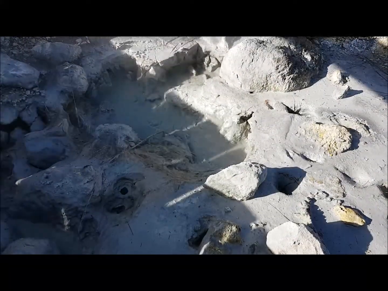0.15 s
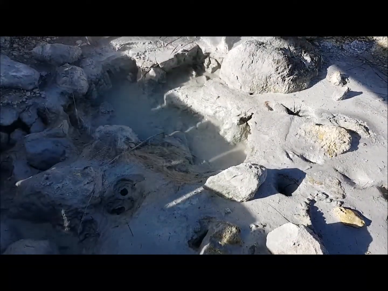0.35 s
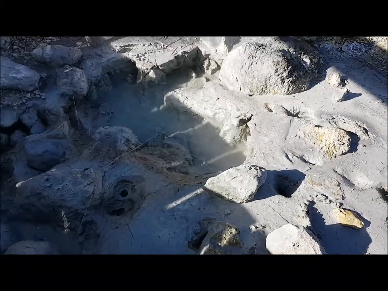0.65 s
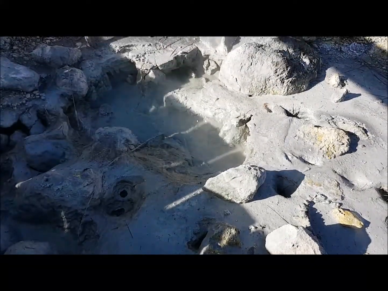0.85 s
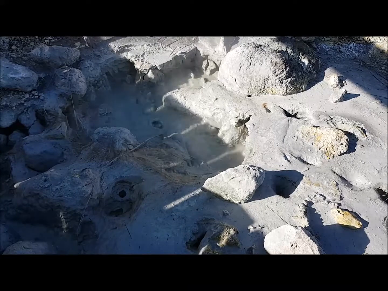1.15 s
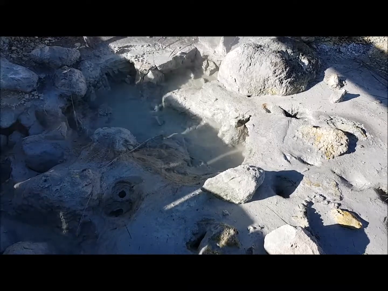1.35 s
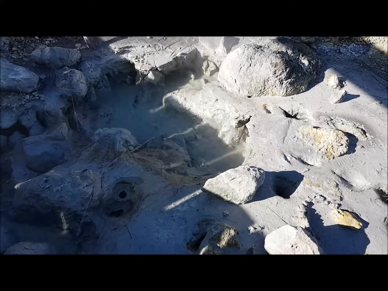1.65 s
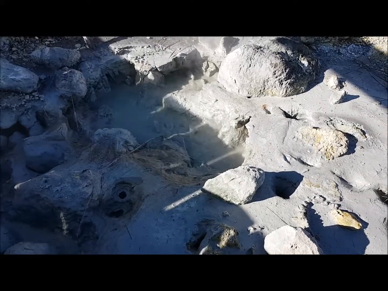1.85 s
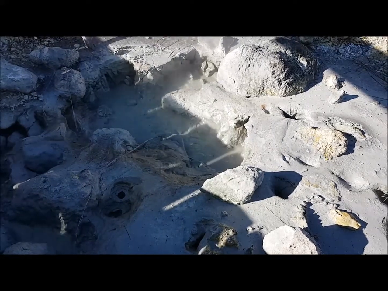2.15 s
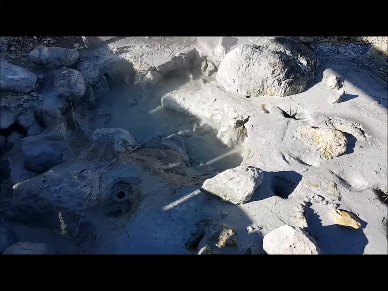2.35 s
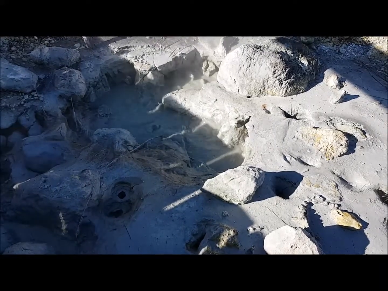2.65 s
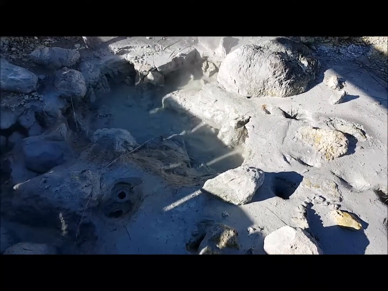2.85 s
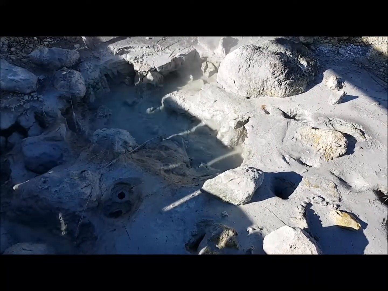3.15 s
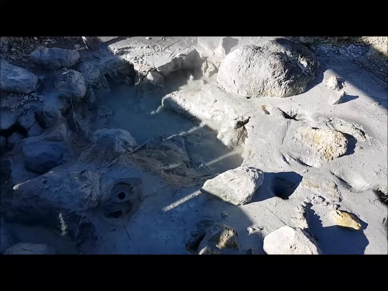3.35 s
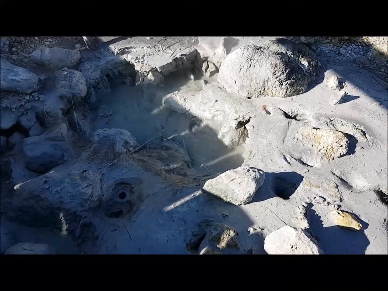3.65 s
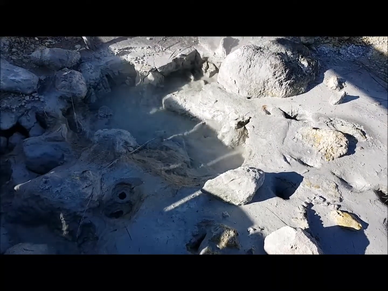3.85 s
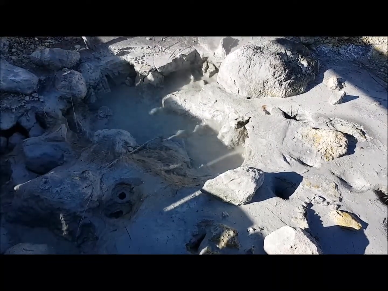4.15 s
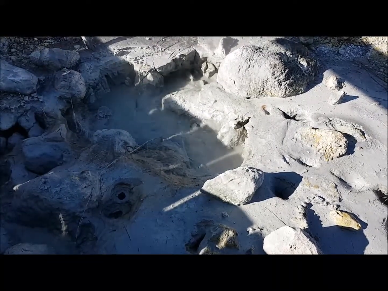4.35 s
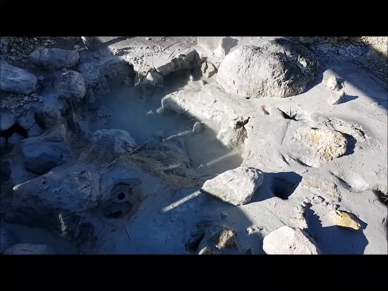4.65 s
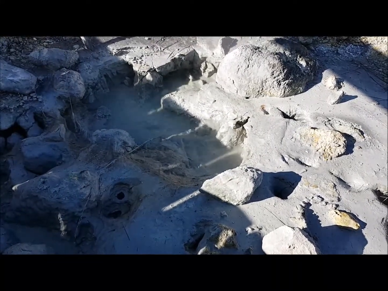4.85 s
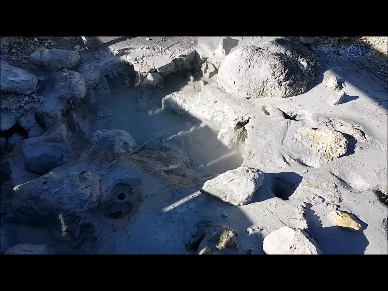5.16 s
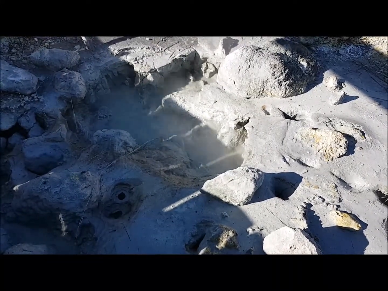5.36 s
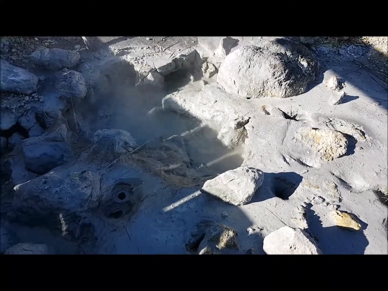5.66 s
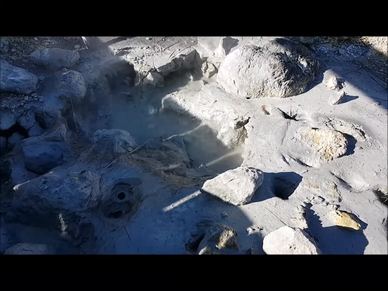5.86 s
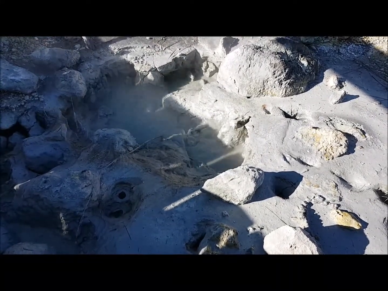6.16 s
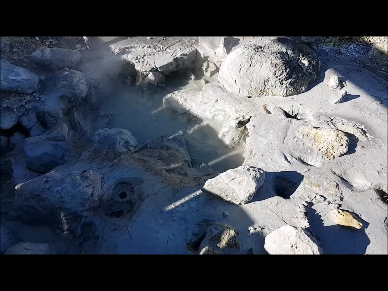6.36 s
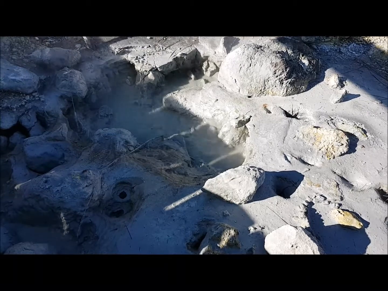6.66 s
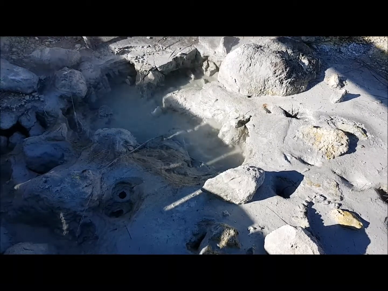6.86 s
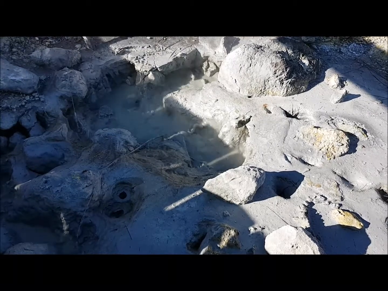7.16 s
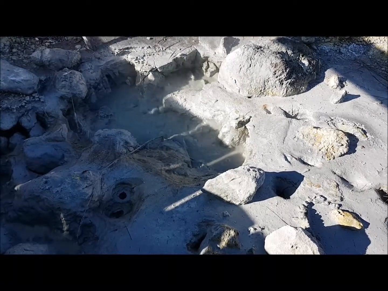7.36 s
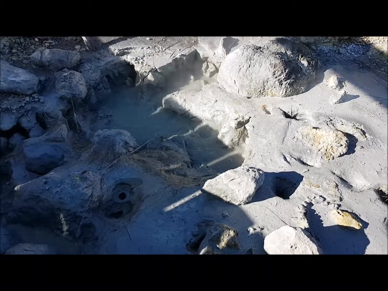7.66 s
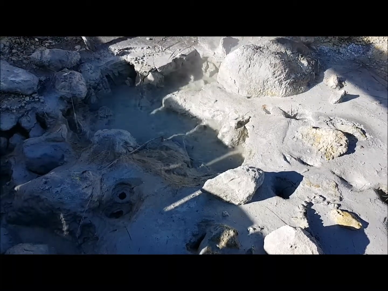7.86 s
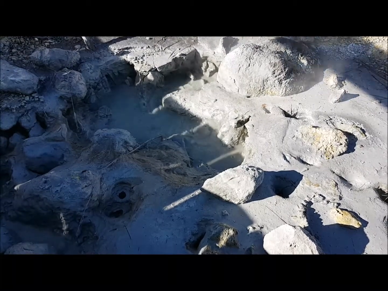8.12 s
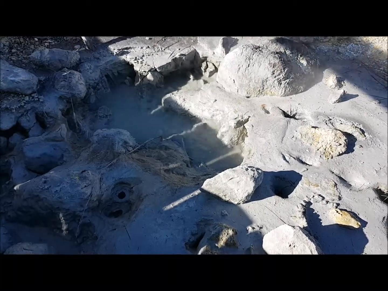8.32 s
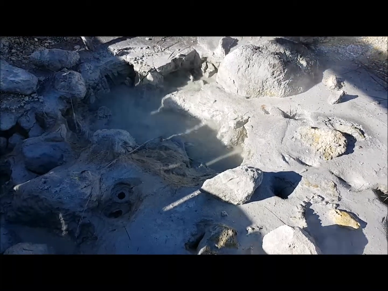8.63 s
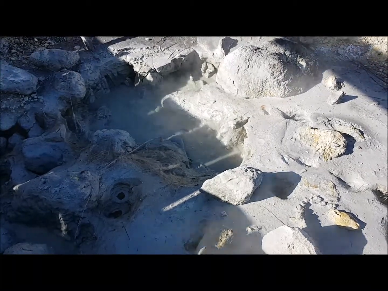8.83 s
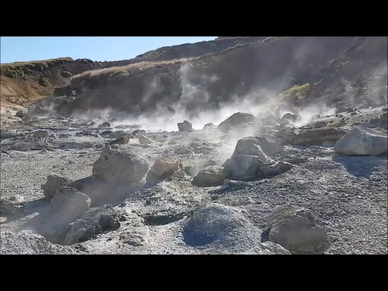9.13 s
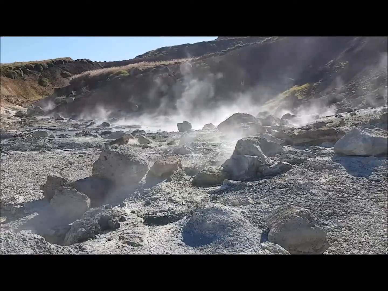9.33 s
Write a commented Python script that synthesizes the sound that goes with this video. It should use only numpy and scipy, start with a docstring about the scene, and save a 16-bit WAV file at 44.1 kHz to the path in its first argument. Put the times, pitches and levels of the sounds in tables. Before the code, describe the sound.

From the start, a hot mud pool boils close to a stereo microphone outdoors. Dense, irregular gulps, round and hollow around the middle pitches, overlap a crowd of smaller bubbles, with short reflections from surrounding rocks. Brighter pops, wet spits, tiny plinks and fine crackle scatter across the width above a thin steady steam hiss and faint low rumble. Wind buffets the microphone at 0.4-0.8 s, lightly around 1.5-2.4 s, hardest at about 3.0 s with low thumps, and again near 4.3 s; the level dips for an instant at 1.4 s. Afterwards the bubbling is clearer, with sharp burst clusters at 6.1 s and a strong pop at 8.2 s. At 8.94 s everything cuts to a very brief silence. From 9.0 s, distant steam vents give a wavering low roar with thin hiss and three dull blubs between 9.2 and 9.35 s.

```python
"""A hot mud pool boils outdoors: swelling sines gulp in a rocky hollow, skins ping and rattle as they burst,
noise puffs spit, random clicks crackle and filtered noise makes a thin hiss of steam over a low rumble.
Gusts of filtered noise and low thumps buffet the two microphone ports, mostly up to 4.5 s; the level dips
briefly at 1.39 s. The pool stops at 8.94 s, a short silence follows, and from 9 s a second scene plays:
distant steam vents, a wavering low noise roar with thin hiss and three dull blubs."""
import sys
import numpy as np
from scipy import signal
from scipy.fft import rfft, irfft
from scipy.io import wavfile

SR = 44100
rng = np.random.default_rng(int(sys.argv[2]) if len(sys.argv) > 2 else 0)


def inscribe(sig):
    """Save sig as 16-bit PCM at rate SR to the path in sys.argv[1].

    A 1-D sig is mono; a 2-D sig holds one channel per row.
    Samples are clipped to [-1, 1] before scaling.
    """
    pcm = np.round(np.clip(np.atleast_2d(sig).T, -1, 1) * 32767)
    wavfile.write(sys.argv[1], SR, pcm.astype(np.int16))


N = 418489
TIME = np.arange(N) / SR
FREQS = np.fft.rfftfreq(N, 1 / SR)
POOL_END_S = 8.944

# phase lead of the left port over the right, by bubble pitch: pitch_hz, lead_rad
LEAD = [(100, -2), (450, 0), (560, 0.32), (700, 0.7), (900, 0), (1300, 3.5), (2000, 2)]
# spectrum of wet crackle: freq_hz, gain_db
SPATTER = [(300, -27), (800, 4.5), (1100, 2.5), (1600, 0), (2000, 2.5), (2400, -2), (3000, -9), (4500, -18),
           (7000, -17.5), (9000, -19), (15500, -16.5)]


def amp(db):
    """Decibels to gain."""
    return 10 ** (np.asarray(db) / 20)


def unit(x):
    """Scales to rms 1."""
    return x / np.sqrt(np.mean(x ** 2) + 1e-20)


def at_hz(points, hz):
    """Interpolates a table on a log-frequency axis."""
    f, value = np.transpose(points)
    return np.interp(np.log(hz + 1), np.log(f + 1), value)


def sides(db):
    """Left and right gains for a left-right level difference."""
    return amp(np.array([[.5], [-.5]]) * db)


def port_lead(hz):
    """Opposite phase offsets (rad) at the left and right ports for this pitch."""
    return np.array([[.5], [-.5]]) * at_hz(LEAD, hz)


def colour(x, points, size=2048):
    """Minimum-phase filter with the given spectrum."""
    log_gain = np.log(amp(at_hz(points, abs(np.fft.fftfreq(2 * size, 1 / SR)))))
    response = np.exp(signal.hilbert(log_gain).conj())
    taps = np.fft.ifft(response).real[:size]
    return signal.oaconvolve(x, taps[None], axes=1)[:, :N]


def drift(per_s):
    """Smooth noise of rms 1 that changes about per_s times a second."""
    lowpass = np.exp(-(FREQS / per_s) ** 2)
    return unit(irfft(rfft(rng.standard_normal(N)) * lowpass, N))


def simmer(swing_db, per_s):
    """Gain that swells and eases at random."""
    return amp(swing_db * drift(per_s))


def add(mix, s, sound):
    """Mixes a stereo sound in at time s."""
    part = mix[:, max(round(s * SR), 0):][:, :sound.shape[1]]
    part += sound[:, :part.shape[1]]


def chance(per_s, count):
    """Poisson event times at per_s a second, each with count normal deviates clipped to +-2."""
    draws = rng.standard_normal((400, count + 2))
    gaps_s = (draws[:, 0] ** 2 + draws[:, 1] ** 2) / (2 * per_s)  # exponential gaps
    times_s = np.cumsum(gaps_s)
    return [(s, *np.clip(row, -2, 2)) for s, row in zip(times_s, draws[:, 2:]) if s < POOL_END_S]


def rocks(x, t60, wet_db, size=4096):
    """Scattered reflections from the rocks: decaying noise tail, different at each port."""
    t = TIME[:size]
    tail = rng.standard_normal((2, size)) * amp(-60 * t / t60) * (t > .002)
    tail /= np.linalg.norm(tail, axis=1, keepdims=True)
    return x + amp(wet_db) * signal.oaconvolve(x, tail, axes=1)[:, :N]


def hollow_ring(x, hz, width_hz, ring_db):
    """One air mode of the hollow, a resonator, rings on after each sound."""
    b, a = signal.iirpeak(hz, hz / width_hz, fs=SR)
    return x + amp(ring_db) * signal.lfilter(b, a, x, axis=1)


def bubble(hz, swell_s, glide, size=2600):
    """A gas pocket swells into a few cycles and dies; its pitch rises as it opens."""
    u = TIME[:size] / max(swell_s, .0003)
    pitch_hz = hz * (1 + glide * (np.tanh(u / 4) - .35))
    turns = np.cumsum(pitch_hz) / SR
    return (u * np.exp(1 - u)) ** 1.5 * np.sin(2 * np.pi * turns + port_lead(hz))


def spray(hz, width, fade_s, swell_s=0.002, grain_db=7, size=2048):
    """A puff of uneven noise grains around one pitch that swells quickly and fades."""
    t, f = TIME[:size], np.fft.rfftfreq(size, 1 / SR)
    band = np.exp(-.5 * (np.log((f + 1) / hz) / width) ** 2)
    shape = (1 - np.exp(-(t / swell_s) ** 2)) * np.exp(-t / fade_s)
    grain_gain = amp(grain_db * np.minimum(rng.exponential(1, (2, size)), 5))
    grains = rng.standard_normal((2, size)) * grain_gain
    return unit(irfft(rfft(grains) * band)) * shape / shape.max()


def gulps(trim_db=-0.6, tick_db=-27, tick_s=.002, echo_db=-14, size=2600):
    """Bubbles break the surface, each with a faint wet tick; the wall of the hollow answers."""
    # individual gulps, before trim and room: start_s, level_db, pitch_hz, swell_s
    single_gulps = [(.103, -28, 540, 0.004), (.148, -33, 560, 0.0021), (.204, -32, 500, 0.0025),
                    (.25, -34, 549, .003), (.423, -28.5, 484, 0.0026), (.514, -30, 533, 0.0025),
                    (.588, -28.5, 516, 0.0048), (.669, -31, 590, 0.0026), (.698, -25.5, 525, 0.0012),
                    (.755, -26.5, 544, 0.005), (.9075, -27, 500, 0.0022), (.939, -31, 534, 0.0023),
                    (.982, -19, 585, 0.0012), (1.002, -20, 660, 0.0019), (1.064, -27.5, 600, 0.0027),
                    (1.141, -27, 690, 0.0024), (1.159, -25, 723, 0.0025), (1.2645, -25, 543, 0.002),
                    (1.455, -24.5, 450, 0.0028), (1.498, -25.5, 650, .0024), (1.5195, -28, 447, 0.0024),
                    (1.544, -25, 523, 0.0023), (1.5825, -25, 530, 0.0029), (1.641, -26, 700, 0.0014),
                    (1.691, -27, 537, 0.0029), (1.817, -25, 540, 0.0029), (1.836, -28, 546, .004),
                    (1.868, -31, 594, .003), (1.889, -27.5, 556, 0.0033), (2.011, -30, 528, 0.0039),
                    (2.077, -30, 490, .003), (2.144, -30, 500, 0.0032), (2.161, -34, 530, 0.0029),
                    (2.308, -23.5, 533, 0.0042), (2.338, -21, 523, 0.0033), (2.457, -29, 732, 0.0031),
                    (2.502, -28, 523, 0.003), (2.53, -32, 524, 0.0036), (2.552, -29, 607, 0.0023),
                    (2.618, -32, 530, 0.0054), (2.701, -21, 644, 0.0024), (2.724, -24, 566, 0.0013),
                    (2.7365, -24, 540, 0.0024), (2.779, -28, 536, 0.002), (2.888, -20.5, 703, 0.0019),
                    (3.0065, -22.5, 456, 0.0019), (3.019, -26.5, 694, 0.002), (3.073, -24, 536, 0.0022),
                    (3.111, -28, 593, 0.0025), (3.162, -23, 680, .0016), (3.213, -25, 576, 0.0017),
                    (3.229, -25, 535, 0.0018), (3.309, -29, 560, 0.0032), (3.355, -27, 430, 0.0034),
                    (3.396, -36, 565, 0.0023), (3.649, -28, 507, 0.0022), (3.691, -30, 520, 0.0037),
                    (3.761, -29.5, 501, 0.0027), (3.819, -29, 528, 0.0035), (3.872, -29, 495, 0.0023),
                    (3.965, -29, 479, .003), (4.001, -26.5, 670, 0.0034), (4.02, -21, 606, 0.0016),
                    (4.037, -26, 484, .0026), (4.103, -28.5, 494, 0.0038), (4.122, -31, 506, 0.0033),
                    (4.1466, -19.5, 716, 0.0031), (4.209, -32, 470, 0.0025), (4.248, -29, 510, .003),
                    (4.384, -27.5, 547, .0028), (4.414, -26.5, 720, 0.0047), (4.468, -28, 533, 0.0032),
                    (4.497, -24.5, 525, 0.0017), (4.588, -32.5, 501, 0.0028), (4.636, -28, 690, 0.0028),
                    (4.72, -21.5, 503, 0.0013), (4.733, -25, 640, .0014), (4.835, -29, 538, .003),
                    (4.858, -32, 501, 0.0035), (4.936, -24.5, 507, 0.0024), (4.95, -23, 638, 0.0024),
                    (5.004, -33, 570, 0.0035), (5.048, -23.5, 694, 0.0033), (5.06, -25.5, 530, 0.003),
                    (5.079, -25, 680, .0022), (5.142, -27, 520, 0.0026), (5.1735, -25.5, 530, 0.0028),
                    (5.251, -22, 696, 0.0032), (5.306, -25, 560, 0.0024), (5.346, -31, 520, .003),
                    (5.361, -25.5, 540, 0.0015), (5.452, -31, 563, 0.0032), (5.546, -25.5, 633, 0.0027),
                    (5.56, -30, 511, .003), (5.584, -27, 496, .003), (5.597, -35, 530, .003),
                    (5.658, -26, 614, 0.0015), (5.732, -29, 534, 0.0034), (5.817, -28, 500, 0.0025),
                    (5.937, -29.5, 480, 0.0025), (5.993, -33, 517, 0.0027), (6.086, -32, 520, 0.0028),
                    (6.115, -31, 744, 0.0017), (6.125, -23, 560, 0.0018), (6.167, -29, 517, .003),
                    (6.21, -28.5, 490, 0.0023), (6.347, -31, 510, 0.0048), (6.367, -26.5, 530, 0.002),
                    (6.385, -30, 526, 0.0025), (6.409, -27, 500, 0.0032), (6.507, -27, 523, 0.0052),
                    (6.537, -26, 655, 0.0021), (6.558, -32, 520, 0.0025), (6.588, -30, 503, 0.0053),
                    (6.616, -27.5, 500, 0.0032), (6.653, -29, 538, 0.0027), (6.727, -32, 680, 0.0017),
                    (6.746, -22.5, 694, 0.0015), (6.764, -30.5, 487, 0.0035), (6.828, -30, 516, 0.0028),
                    (6.863, -31, 511, 0.0025), (6.885, -27.5, 680, 0.0027), (6.907, -28, 699, .0025),
                    (7.066, -25, 670, 0.0017), (7.079, -22, 710, 0.0022), (7.113, -32, 530, 0.0023),
                    (7.132, -33, 501, 0.0026), (7.144, -29.5, 536, 0.0046), (7.1975, -22, 630, 0.0012),
                    (7.251, -19, 600, 0.0014), (7.262, -25.5, 522, 0.004), (7.276, -28.5, 525, 0.0023),
                    (7.327, -30.5, 495, .003), (7.357, -32.5, 479, 0.0033), (7.405, -27, 517, 0.0051),
                    (7.437, -26.5, 544, 0.0028), (7.504, -21.5, 680, 0.0033), (7.589, -26, 528, 0.0057),
                    (7.628, -29.5, 520, 0.0021), (7.708, -30, 520, 0.0023), (7.76, -26.5, 513, 0.0047),
                    (7.783, -25, 690, 0.0029), (7.8205, -28, 503, 0.0033), (7.867, -27, 540, 0.0028),
                    (7.99, -27, 502, 0.0032), (8.074, -21.5, 534, 0.0039), (8.101, -26, 510, 0.0014),
                    (8.174, -23.5, 500, 0.0029), (8.195, -27, 527, 0.0027), (8.231, -22, 593, 0.0013),
                    (8.249, -29, 560, .003), (8.262, -32, 500, 0.0024), (8.281, -27, 560, .0016),
                    (8.325, -31, 516, 0.0029), (8.373, -24.5, 573, 0.0047), (8.393, -31.5, 245, 0.0045),
                    (8.448, -24, 560, 0.0015), (8.48, -27.5, 680, 0.004), (8.499, -30.5, 538, 0.0026),
                    (8.577, -26, 725, 0.0045), (8.609, -33, 540, 0.0027), (8.642, -28.5, 530, 0.0028),
                    (8.808, -23, 554, 0.0021), (8.859, -27.5, 526, .003), (8.899, -27, 603, .0018)]
    tones, ticks = np.zeros((2, 2, N))
    tick_fade = np.exp(-TIME[:size] / tick_s)
    for s, db, hz, swell_s in list(single_gulps) + random_gulps():
        tone = amp(db + trim_db) * bubble(hz, swell_s, glide=rng.uniform(0.0138, 0.081))
        add(tones, s, tone)
        add(tones, s + rng.uniform(0.00389, 0.00738), amp(echo_db) * tone)
        add(ticks, s, amp(db + tick_db) * rng.standard_normal((2, size)) * tick_fade)
    boil = hollow_ring(tones, hz=503, width_hz=50, ring_db=-9)
    return rocks(boil + colour(ticks, SPATTER), t60=0.08, wet_db=-14)


def random_gulps(per_s=8, level_db=-34, spread_db=1.5, low_hz=500, high_hz=680, high_share=.3,
                 scatter=0.13, swell_s=0.0022):
    """More bubbles rise at random; most ring low in the hollow, some higher."""
    events = []
    for s, a, b, c in chance(per_s, count=3):
        hz = high_hz if rng.random() < high_share else low_hz
        events.append((s, level_db + spread_db * a, hz * np.exp(scatter * b), swell_s * np.exp(0.3 * c)))
    return events


def churn(level_db=-39.5, swell_cycles=1, lag_samples=9, count=48):
    """A crowd of smaller bubbles of all sizes, ringing in the hollow."""
    # small bubbles as the hollow colours them: freq_hz, gain_db
    hollow = [(40, -30.5), (120, -14), (250, -8), (320, -7), (380, -1), (440, 0.5), (510, 4), (590, -1),
              (640, -5), (710, -1.5), (830, -8.5), (1000, -11.5), (1250, -17.5), (1550, -26), (3000, -39)]
    sizes = amp(2.3 * np.minimum(rng.exponential(1, N), 3))
    sizes *= rng.random(N) < 1300 / SR  # 1300 bubbles a second
    kind, out = rng.integers(0, count, N), np.zeros((2, N))
    for k, hz in enumerate(np.geomspace(110, 1700, count)):
        left, right = bubble(hz, swell_cycles / hz, glide=0.19) * hz
        lag = lag_samples * (-1) ** k  # neighbouring sizes rise at opposite banks
        ring = np.array([np.roll(left, max(lag, 0)), np.roll(right, max(-lag, 0))])
        out += signal.oaconvolve((sizes * (kind == k))[None], ring, axes=1)[:, :N]
    crowd = unit(rocks(colour(out, hollow), t60=0.067, wet_db=-9.5))
    return amp(level_db) * simmer(swing_db=1.0, per_s=14) * crowd


def pops(ring_cycles=1.58, spray_db=-13.5, spray_s=0.0039, width=0.18, size=2048):
    """A mud skin bursts: a short ping together with a wet rattle around the same pitch."""
    # individual bursts, before room: start_s, level_db, pitch_hz, left_right_db
    bursts = [(.203, -35, 1900, 4), (.253, -34, 1120, 2), (.419, -39, 1280, -1), (.54, -34, 1110, 2),
              (.569, -36, 1930, 4), (.5935, -35, 1620, 3), (.709, -36, 1240, 0), (.767, -35, 1460, 1),
              (.931, -38, 1280, -1), (1.066, -34, 2050, 3), (1.069, -28, 1400, 4), (1.084, -34, 1030, -1),
              (1.118, -34, 1200, 2), (1.308, -33, 1220, 2), (1.495, -35, 1800, 6), (1.6425, -34, 1040, -1),
              (1.892, -32, 2140, 5), (1.956, -37, 1880, 4), (2.044, -37, 1040, -2), (2.228, -34, 1660, -4),
              (2.282, -41, 1090, 1), (2.38, -40, 1230, 1), (2.531, -32, 1260, 1), (2.78, -35, 1120, 4),
              (2.827, -29, 1130, -2.5), (2.854, -36, 1080, 1), (2.925, -37, 1140, 3), (2.967, -40, 1030, 4),
              (3.004, -32, 1710, -8), (3.106, -33, 1140, -4), (3.128, -26, 1340, 3), (3.138, -31, 2080, 4),
              (3.205, -35, 2010, 5), (3.303, -30, 1990, 4), (3.533, -35, 1770, 2), (3.689, -38, 1440, 3),
              (3.835, -33, 1140, -1), (3.894, -27.5, 2400, 7), (4.131, -32.5, 2230, 7),
              (4.262, -39, 1120, -2), (4.413, -32, 990, -1), (4.49, -37, 2050, 6), (4.638, -36, 1840, 6),
              (4.699, -41, 1100, 0), (4.7345, -34, 960, -3), (4.828, -30, 1860, 8), (5.361, -34, 1080, -1),
              (5.381, -36, 1050, -1), (5.4, -33.5, 1840, 4), (5.455, -32, 1970, 6), (5.475, -33.5, 1090, 2),
              (5.49, -36, 1060, 0), (5.544, -30, 1370, 5), (5.7385, -32, 1050, 0), (5.754, -33, 2160, -1),
              (5.8175, -34, 980, 2), (5.854, -33, 2060, -1), (5.889, -32, 1190, -3), (5.979, -38, 1090, 4),
              (6.113, -33, 2090, 3), (6.1145, -29, 1180, 1), (6.123, -33, 2960, 4), (6.1375, -26, 1850, -3),
              (6.1385, -29, 1150, 2), (6.1425, -26.5, 1370, 2), (6.147, -32, 1200, 3),
              (6.289, -36, 1080, 1), (6.37, -37, 1910, 3), (6.724, -35, 1150, 2), (6.761, -33, 1270, 0),
              (6.9085, -36, 960, 2), (7.06, -39, 1890, 4), (7.181, -33, 1010, 0), (7.788, -24.5, 1860, 4),
              (7.894, -32, 1880, 7), (7.906, -33, 1900, 4), (7.918, -30, 1910, 5), (8.101, -36, 1890, 2),
              (8.134, -31, 1470, 3), (8.201, -34, 1200, 1), (8.222, -31, 1060, 3), (8.229, -31, 2050, 2),
              (8.2337, -19.5, 1010, 0), (8.234, -19.5, 1900, 7), (8.2375, -27, 2000, -6),
              (8.2385, -36, 900, -1), (8.244, -30, 2140, -5), (8.425, -33, 2010, 5), (8.445, -38, 1120, 4),
              (8.786, -30, 1930, 7), (8.817, -36, 1290, 3), (8.8285, -29, 1250, 5), (8.917, -34, 1860, 3),
              (8.929, -37, 1090, 7)]
    out, t = np.zeros((2, N)), TIME[:size]
    for s, db, hz, pan_db in list(bursts) + random_pops():
        u = t * hz / ring_cycles
        lead = port_lead(hz) * rng.uniform(0.69, 1)
        ping = (u * np.exp(1 - u)) ** 2 * np.sin(2 * np.pi * hz * t + lead)
        rattle = amp(spray_db) * spray(hz, width, spray_s)
        add(out, s, amp(db) * sides(pan_db) * (ping + rattle))
    return rocks(hollow_ring(out, hz=2000, width_hz=180, ring_db=-9), t60=0.08, wet_db=-12.5)


def random_pops(per_s=5, level_db=-44, hz=1950, scatter=0.2, pan_db=3, pan_spread_db=3.0):
    """Weaker bursts come at random across the pool, all at one level."""
    return [(s, level_db, hz * np.exp(scatter * a), pan_db + pan_spread_db * b)
            for s, a, b in chance(per_s, count=2)]


def spits(width=0.23, snap_db=-9, snap_hz=7800, snap_width=0.25, snap_s=0.0025):
    """A thin film snaps and its droplets patter down: two noise puffs at once."""
    # individual droplet showers, before room: start_s, level_db, centre_hz, left_right_db, fade_s
    showers = [(.204, -48.5, 4400, .5, 0.0055), (.217, -47, 3310, 3, .005), (.237, -53, 3370, -1, .004),
               (.366, -56, 4080, -3, .003), (.566, -47, 4630, -5, .006), (1.118, -49, 3680, -2, .0054),
               (1.771, -51, 5040, 2, 0.0056), (1.791, -47, 4560, 3, .003), (1.892, -45, 3480, 0, 0.0044),
               (1.928, -48, 4790, 3, .003), (1.942, -48, 3560, -.5, .0055), (1.962, -50, 2850, 1, .004),
               (2.102, -48.5, 4800, -2, .0046), (2.38, -47, 3520, -2, 0.0036), (2.531, -49, 3710, -1, .006),
               (2.731, -53, 3880, 7, 0.0037), (2.826, -52, 3720, -6, .004), (2.925, -50, 3640, -2, 0.0082),
               (2.975, -44, 3040, 3, .004), (3.015, -50, 5160, 4, .005), (3.205, -45, 3000, 4, 0.0024),
               (3.892, -38.5, 4770, 4, 0.0015), (3.893, -42, 11500, 2, 0.0017), (4.13, -49, 4370, 3, .003),
               (4.38, -51, 3540, 0, .003), (4.731, -48, 14400, 9, .0055), (4.749, -47, 3440, -3, .003),
               (5.387, -52, 3650, -1, .004), (5.454, -53, 2860, -2, .004), (5.469, -50, 3710, -2, .004),
               (5.661, -43.5, 3620, 0, 0.009), (5.74, -46, 3540, 1, .005), (5.752, -48.5, 3650, 0, .004),
               (6.004, -46, 14000, 1.5, .0042), (6.138, -46.5, 4330, -3, 0.0035),
               (6.368, -42, 3640, -7, 0.004), (6.652, -50, 3600, -3, .006), (6.847, -48, 3710, 2, 0.0038),
               (7.276, -50, 3950, 2, .003), (7.304, -43.5, 4640, -1, 0.0033),
               (7.707, -47.5, 4780, 5, 0.0027), (7.787, -49, 3740, 0, 0.0024),
               (7.917, -45.5, 3070, 0, .004), (8.108, -46, 13800, 4, 0.0054), (8.133, -49, 3700, 0, .003),
               (8.274, -52, 3430, 3, .004), (8.43, -50, 8100, 7, 0.0031), (8.595, -47, 3140, 5, .004)]
    out = np.zeros((2, N))
    for s, db, hz, pan_db, fade_s in list(showers) + random_spits():
        snap = amp(snap_db) * spray(snap_hz, snap_width, snap_s)
        add(out, s, amp(db) * sides(pan_db) * (spray(hz, width, fade_s) + snap))
    return rocks(out, t60=0.082, wet_db=-8.0)


def random_spits(per_s=1.3, level_db=-55, spread_db=1.0, hz=3700, scatter=0.11, fade_s=0.01):
    """Faint showers of droplets fall at random, all centred."""
    return [(s, level_db + spread_db * a, hz * np.exp(scatter * b), 0, fade_s)
            for s, a, b in chance(per_s, count=2)]


def crackle(per_s, spread_db, clump_db, count=9):
    """Clumps of tiny clicks from spots across the pool, each spot with its own delay between the ports."""
    sizes = amp(spread_db * np.minimum(rng.exponential(1, N), 4) + clump_db * drift(per_s=20.4))
    left = sizes * rng.choice([-1, 1], N) * (rng.random(N) < per_s / SR)
    spot = rng.integers(0, count, N)
    lags = np.linspace(-18, 18, count).astype(int)  # samples
    right = sum(np.roll(left * (spot == k), lag) for k, lag in enumerate(lags))
    return np.array([left, right])


def spatter(level_db=-53.5):
    """Thin films of mud snap all over the pool: coloured clicks."""
    snaps = colour(crackle(per_s=900, spread_db=4.0, clump_db=3), SPATTER)
    return amp(level_db) * simmer(swing_db=1.0, per_s=5) * unit(rocks(snaps, t60=0.03, wet_db=-5))


def drips(level_db=-58.5, per_s=150, spread_db=4.5, clump_db=3, cycles=3, count=24):
    """Tiny bubbles and falling drops plink in clusters, with a phase at each port for each pitch."""
    # plink strength by pitch: pitch_hz, gain_db
    strength = [(950, 1.5), (1250, 1.5), (1600, -12), (2000, -0.5), (2800, -6), (3800, -3.5), (5200, -22)]
    sizes = amp(spread_db * np.minimum(rng.exponential(1, N), 3) + clump_db * np.tanh(drift(per_s=15)))
    sizes *= rng.random(N) < per_s / SR
    kind, out = rng.integers(0, count, N), np.zeros((2, N))
    t = TIME[:1200]
    for k, hz in enumerate(np.geomspace(950, 5200, count)):
        u = t * hz / cycles
        plink = u ** 2 * np.exp(-2 * u) * np.sin(2 * np.pi * (hz * t + rng.random((2, 1))))
        hits = signal.oaconvolve((sizes * (kind == k))[None], plink, axes=1)[:, :N]
        out += amp(at_hz(strength, hz)) * hits
    return amp(level_db) * unit(rocks(out, t60=0.046, wet_db=-2.5))


def steam(level_db=-51.5, fizz_db=-6, flutter_db=1.0):
    """Even noise hiss with the clicking fizz of the smallest bubbles in it."""
    # steam at the pool: freq_hz, gain_db
    spectrum = [(100, -3), (500, 17.5), (1000, 7.5), (2000, 10.5), (3000, 4.5), (5000, 2), (6000, 1),
                (7100, -5.5), (8400, 1.5), (9700, -2), (11200, 1), (12500, -3), (13700, -0.5), (15800, -7)]
    hiss = rng.standard_normal((2, N)) * amp(flutter_db * drift(per_s=29))
    clicks = crackle(per_s=500, spread_db=4.5, clump_db=-3.5)
    fizz = unit(rocks(clicks, t60=0.035, wet_db=-2.5))
    both = unit(colour(hiss + amp(fizz_db) * fizz, spectrum))
    return amp(level_db) * simmer(swing_db=0.2, per_s=3.6) * both


def rumble(level_db=-54, shared=5.1):
    """The steaming ground all around gives a steady low rumble, mostly common to both ports."""
    # ground rumble: freq_hz, gain_db
    spectrum = [(25, -14), (55, -7), (95, 0), (160, -1), (220, -3), (350, -9.5), (800, -27.5), (3000, -59)]
    roar = rng.standard_normal((2, N)) + shared * rng.standard_normal(N)
    return amp(level_db) * unit(colour(roar, spectrum))


def thumps(cycles=0.74, tear_db=-12.5, tear_hz=420, tear_width=0.41, tear_s=0.0093, size=2048):
    """Single eddies slap the ports: a low push of a cycle or two with a puff of torn air."""
    # single eddies: centre_s, level_db, pitch_hz, left_right_db
    slaps = [(0.184, -34, 160, -7), (.341, -35, 92, -12), (.419, -34.5, 213, -14), (.704, -33, 181, -17),
             (0.763, -26.5, 218, -14.5), (.785, -33, 157, -9), (1.945, -30, 117, -13),
             (2.375, -31, 108, -7), (2.954, -26, 120, -3), (2.973, -26, 150, -6), (2.992, -21.5, 135, -5),
             (2.999, -25, 230, -5), (3.008, -23, 300, -7), (3.023, -25, 157, -3), (3.042, -25, 196, -13),
             (3.095, -27, 223, -17), (3.202, -30, 187, -11), (3.538, -37, 112, 1), (3.602, -34, 133, -13),
             (3.904, -31, 86, -1), (3.942, -31, 108, 9), (4.235, -29, 97, 5), (4.294, -31, 105, -8),
             (4.314, -25.5, 142, -10), (4.381, -30, 130, -11), (4.418, -30.5, 258, -14),
             (7.354, -37, 124, -9)]
    half_s = TIME[size // 2]
    out, t = np.zeros((2, N)), TIME[:size] - half_s
    for s, db, hz, pan_db in slaps:
        push = np.exp(-(t * hz / cycles) ** 2) * np.sin(2 * np.pi * (hz * t + rng.random((2, 1))))
        add(out, s - half_s, amp(db) * sides(pan_db) * push)
        add(out, s, amp(db + tear_db) * sides(pan_db) * spray(tear_hz, tear_width, tear_s))
    return out


def wind(lump_db=2, pan_db=-4.0):
    """Noise eddies buffet each port on its own; strong gusts reach higher in pitch."""
    # wind on the ports: freq_hz, gain_db
    buffet = [(8, -33), (25, -12.5), (50, -5.5), (80, 1), (140, -4), (250, -11), (400, -17), (800, -40),
              (2000, -63), (8000, -82)]
    # air tearing at the ports in a strong gust: freq_hz, gain_db
    tearing = [(25, -26), (60, -11), (140, -4), (230, 4.5), (350, -3), (650, -11.5), (900, -20),
               (3000, -41), (8000, -76)]
    gust_db = wind_db()
    lumps = amp(lump_db * np.array([drift(per_s=19), drift(per_s=31)]))
    eddies = unit(colour(rng.standard_normal((2, N)) * lumps, buffet))
    torn = unit(colour(rng.standard_normal((2, N)), tearing))
    torn = torn * amp(0.5 * (gust_db + 26.5))  # grows faster than the eddies
    return amp(gust_db) * sides(pan_db) * (eddies + torn)


def wind_db(waver_db=2):
    """Each gust builds and dies away on top of a wavering breeze; their powers add."""
    # gusts: peak_s, level_db, rise_s, fall_s
    gusts = [(.58, -38, 0.064, 0.067), (.78, -35, 0.038, 0.02), (1.45, -40, 0.039, 0.035),
             (1.59, -38, 0.016, 0.03), (1.94, -37.5, 0.053, 0.064), (2.38, -44.5, 0.033, 0.092),
             (3.002, -29.5, 0.038, 0.036), (3.1, -34.5, .02, .03), (3.235, -34, 0.031, 0.03),
             (3.395, -36.5, .02, .025), (3.53, -38, 0.023, 0.034), (3.9, -41.5, 0.052, 0.049),
             (4.31, -34.5, 0.023, 0.067), (4.46, -41, 0.035, 0.081), (6.5, -47, .03, .03),
             (6.62, -45, 0.025, 0.026), (8.86, -46, 0.036, 0.025)]
    # breeze between the gusts: time_s, level_db
    breeze = [(0, -42.5), (1, -47), (4.4, -47), (4.8, -76), (6, -80), (6.6, -57), (8.9, -72)]
    breeze_db = np.interp(TIME, *np.transpose(breeze))
    power = amp(breeze_db + waver_db * drift(per_s=5.8)) ** 2
    for s, db, rise_s, fall_s in gusts:
        away = np.maximum((s - TIME) / rise_s, (TIME - s) / fall_s)
        power = power + amp(db) ** 2 * np.exp(-np.minimum(away, 20) ** 1.47)
    return 10 * np.log10(power)


def lull(centre_s=1.387, depth_db=-16, width_s=0.015):
    """The level dips briefly."""
    return amp(depth_db * np.exp(-((TIME - centre_s) / width_s) ** 4))


def vents(level_db=-45.25, shared=0.56, waver_db=4.0, roar_hz=600):
    """Far vents blend into a wavering low roar with a thin, even hiss and a few dull blubs."""
    # distant vents: freq_hz, gain_db
    spectrum = [(30, -24), (120, -7), (250, -12), (340, -11.5), (430, -17), (600, -21), (800, -29.5),
                (1500, -33.5), (2500, -34), (3800, -37.5), (5000, -42), (9500, -43.5), (13000, -43.5),
                (15700, -46)]
    # dull blubs: start_s, level_db, pitch_hz, swell_s
    blubs = [(9.2, -38, 125, .008), (9.252, -38.5, 175, 0.0083), (9.338, -38.5, 327, 0.01)]
    noise = rng.standard_normal((2, N)) + shared * rng.standard_normal(N)
    both = unit(colour(noise, spectrum))
    roar = irfft(rfft(both) * np.exp(-(FREQS / roar_hz) ** 4), N)
    hiss = both - roar
    out = amp(level_db) * (hiss + roar * amp(waver_db * np.tanh(drift(per_s=14))))
    for s, db, hz, swell_s in blubs:
        add(out, s, amp(db) * bubble(hz, swell_s, glide=.1))
    return out


def scene(fade_s=0.0012, vents_start_s=8.998):
    """The pool in the wind, a moment of silence, then the far vents."""
    # left-right balance of the pool: freq_hz, left_right_db
    balance = [(100, 0), (380, -2), (550, -1.5), (720, 1.5), (1100, 1), (1350, 2), (1900, 4), (2600, -0.5),
               (4400, -1.5), (6500, -1.5), (8200, 4), (9500, -3.5), (12000, 1), (15000, 4.5)]
    dip = lull()
    mud = (gulps() + churn() + drips() + rumble()) * dip
    pool = irfft(rfft(mud + spatter() + steam()) * sides(at_hz(balance, FREQS)), N)
    near = pool + pops() + spits() + thumps() + wind() * dip
    fade = np.exp(-np.maximum(TIME - POOL_END_S, 0) / fade_s)
    return near * fade + vents() * (TIME > vents_start_s)


def record(dry, edge_hz=15850):
    """Band limit: a steep linear-phase low-pass."""
    taps = signal.firwin(611, edge_hz, window=("kaiser", 9), fs=SR)
    return signal.oaconvolve(dry, taps[None], "same")


dry = scene()
out = record(dry)
inscribe(out)
```